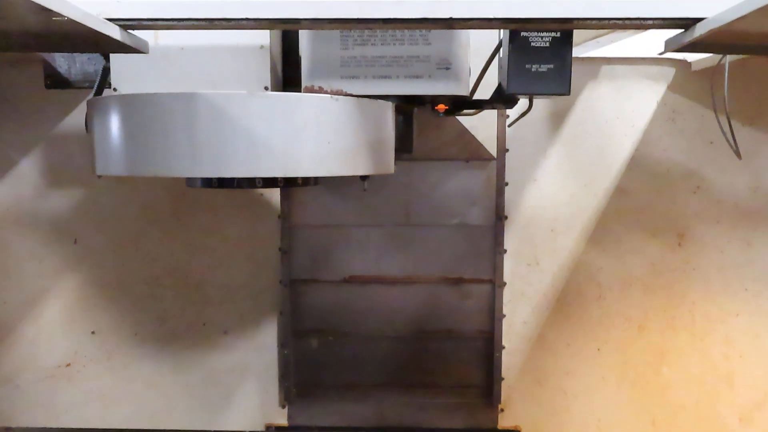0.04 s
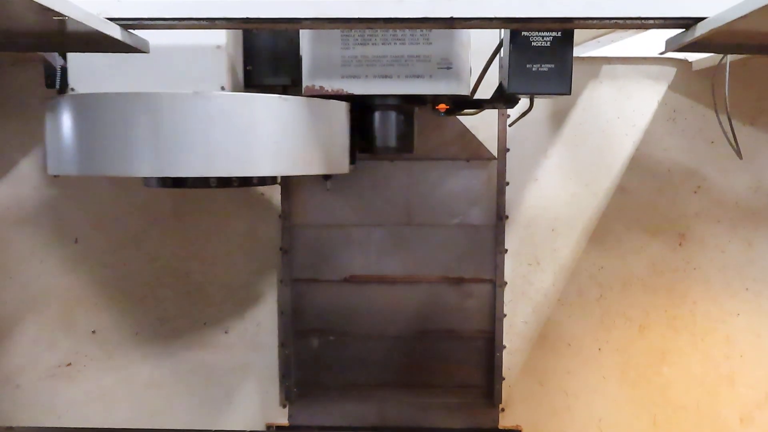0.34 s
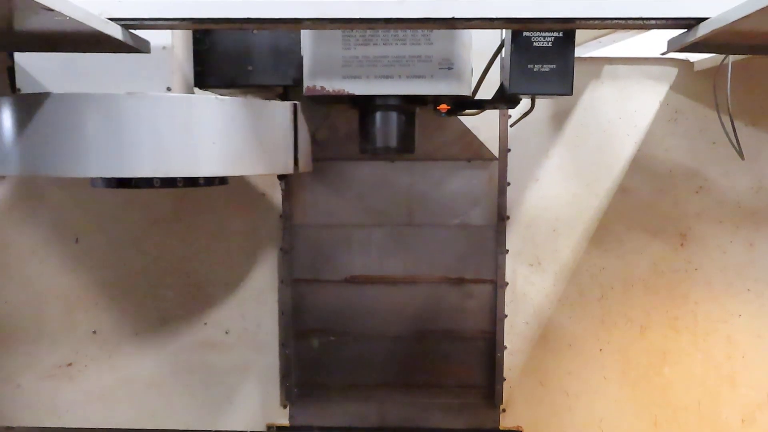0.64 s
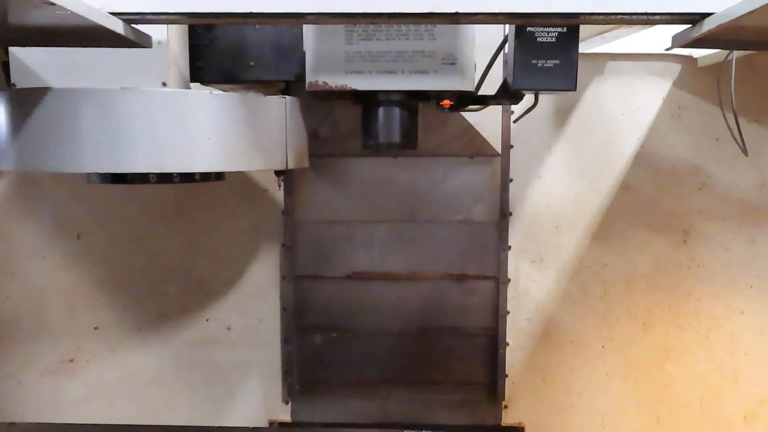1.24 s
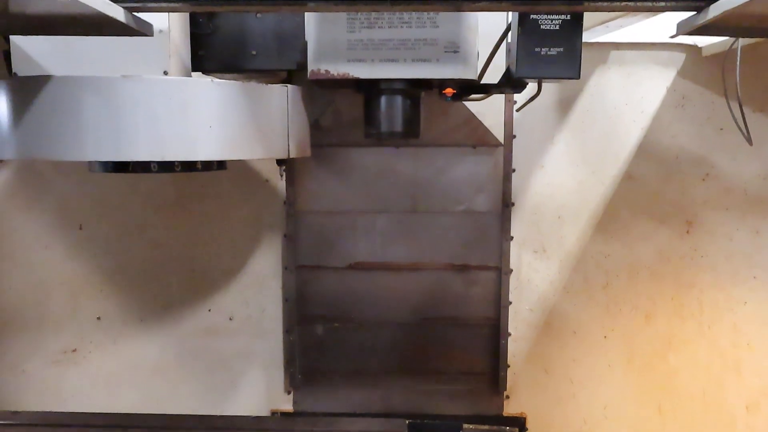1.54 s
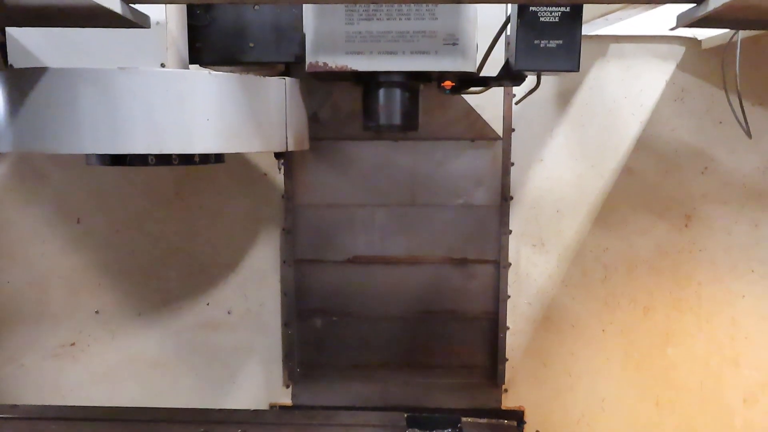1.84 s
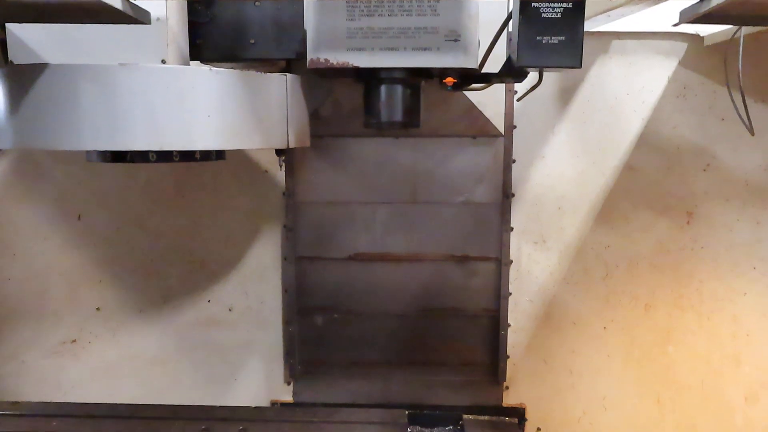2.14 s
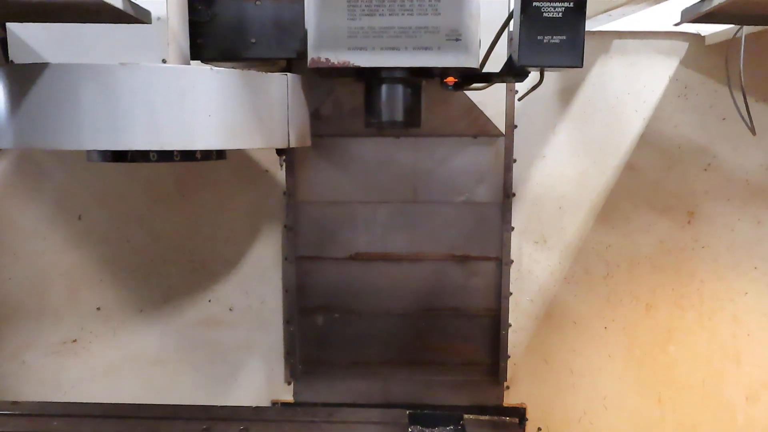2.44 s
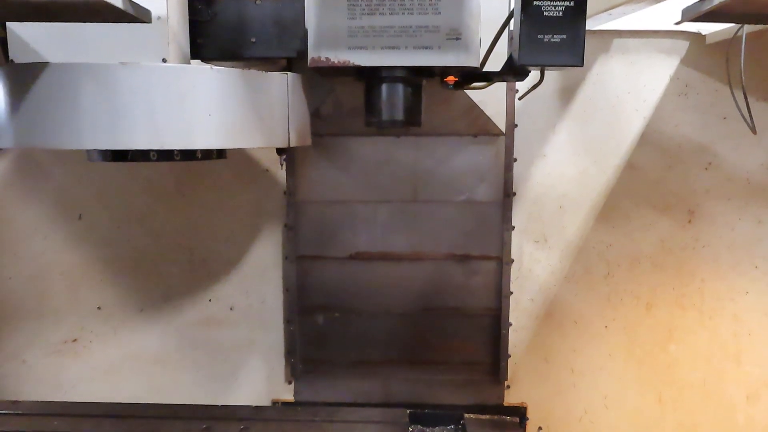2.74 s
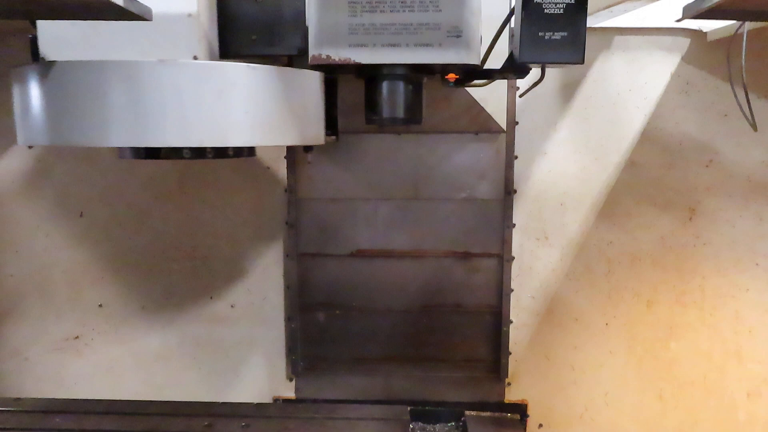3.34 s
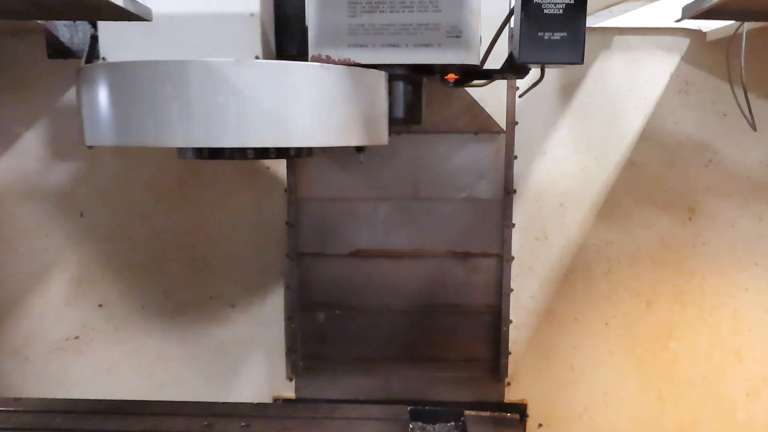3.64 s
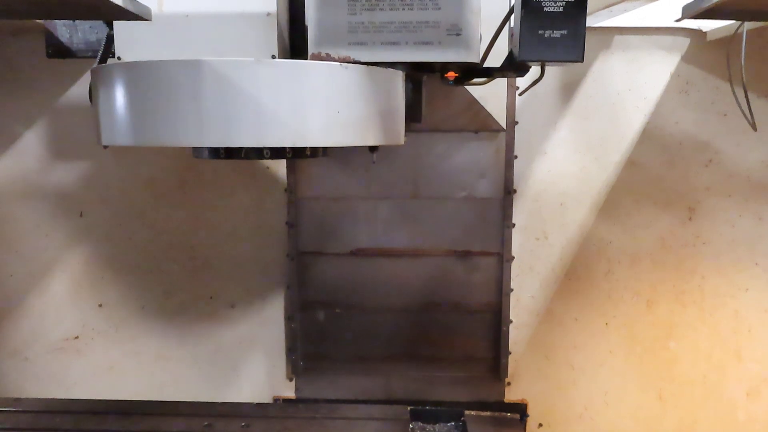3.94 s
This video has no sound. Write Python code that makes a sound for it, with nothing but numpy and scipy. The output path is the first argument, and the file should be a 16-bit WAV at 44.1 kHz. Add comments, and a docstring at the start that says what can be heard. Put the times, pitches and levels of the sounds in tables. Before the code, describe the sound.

An idling machining centre drones and clatters steadily over rushing fans and coolant, heard close at its open enclosure. The tool carousel rumbles in, scrapes briefly, then slides back out, ending with a rattle and a soft bump.

```python
"""The pump of an idling machining centre, heard from a close stereo pair at the open enclosure.
It knocks several times in every turn of its shaft and makes the sheet metal drone. The tool carousel
slides in and later back out, rumbling on its rails, and ends its travel with a rattle and a soft bump.
Behind them are the rush of fans and coolant, whirring drives, thin bearing whistles and mains hum."""
import sys
import numpy as np
from scipy import signal
from scipy.fft import rfft, irfft
from scipy.io import wavfile
from scipy.ndimage import uniform_filter1d, map_coordinates

SR = 44100
rng = np.random.default_rng(int(sys.argv[2]) if len(sys.argv) > 2 else 0)


def wav_out(sig):
    """Save sig, one row per channel (or a flat mono array), as 16-bit PCM at SR to the path in sys.argv[1]."""
    wavfile.write(sys.argv[1], SR, np.round(np.clip(np.atleast_2d(sig).T, -1, 1) * 32767).astype(np.int16))


N = 176400


def pump(t, size=4096):
    """The same knocks ring housing and panels in every turn, droning at multiples of the shaft rate."""
    # The knocks of one turn. Each row: delay in ms, strength in dB.
    knocks = [(.32, -2.1), (16.42, -11.1), (17.21, -11), (22.88, -10.7), (33.36, -7.2), (38.01, -7.6),
              (39.5, -13.6), (45.05, -6.5)]
    # Modes of the pump housing. Each row: frequency in Hz, width in Hz.
    housing = [(108, 13), (216, 56), (487.5, 12), (526.4, 12), (643, 26.5), (921, 31)]
    # Drone of pump and housing. Each row: multiple of the shaft rate, level in dB.
    drone = [(2, -56), (3, -71), (4, -44), (5, -42), (6, -41), (7, -50), (8, -37), (9, -47), (10, -36),
             (11, -31.5), (12, -33), (13, -36), (14, -42), (15, -45), (16, -37), (17, -49), (18, -38),
             (19, -46), (20, -39), (21, -46), (22, -44), (23, -40), (24, -52), (25, -43), (26, -38),
             (27, -41), (28, -43), (29, -29.8), (30, -33), (31, -37), (32, -42), (33, -32), (34, -27),
             (35, -30), (36, -37), (37, -42), (38, -47), (39, -42), (40, -42), (41, -50), (42, -35),
             (43, -38), (44, -41), (45, -45), (46, -33), (47, -35), (48, -41), (49, -31.5), (50, -50),
             (51, -45), (52, -44), (53, -41), (54, -37), (55, -41), (56, -43), (57, -37), (58, -45),
             (59, -43), (60, -42)]
    # Higher multiples that the panels pick out. Each row: frequency in Hz, level in dB.
    whine = [(1136, -45), (1155, -46), (1228, -46), (1320, -41), (1393, -42), (1613, -45), (1631, -38),
             (1650, -43), (1760, -39), (1796, -46), (1833, -46.5), (1869, -44.5), (1906, -41),
             (2034, -43.5), (2236, -47), (2511, -48), (2584, -46), (3171, -50), (3391, -51), (3601, -51),
             (4043, -53), (4156, -54)]
    # The rest of the clatter. Each row: frequency in Hz, level per multiple in dB.
    clatter = [(1100, -51), (1300, -58), (1550, -51), (1850, -47), (2300, -51), (2850, -61.5), (3400, -55),
               (5000, -67), (7000, -74.5), (14000, -83)]
    # The pump grows a little louder. Each row: time in seconds, gain in dB.
    level = [(0, -2.5), (1, -0.47), (2, 0.25), (3, 0.56), (4, 0.5)]
    shaft_hz, first_knock_s, speed_wander = 18.328, .0441, .0003
    ring_s, ring_db, ring_hz = .013, 8, 1510  # sheet metal rings in the treble after each knock
    throb_db, throb_s = .9, .005  # the pump labours once a turn, just after the first knock
    drift_s = speed_wander * np.cumsum(walk(count=8, size=N)) / SR
    turns = shaft_hz * (t - first_knock_s + drift_s)
    age = np.arange(size) / size / shaft_hz
    hz = np.arange(size // 2 + 1) * shaft_hz + 1e-9
    treble = undb(ring_db) / (1 + (ring_hz / hz) ** 2) ** 2
    lines = 0
    for ms, db in knocks:
        ring = rng.standard_normal(size) * np.exp(-age / ring_s)
        knock = undb(db) + treble * rfft(ring / np.linalg.norm(ring))
        lines = lines + knock * np.exp(-2j * np.pi * hz * ms / 1000)
    lines = lines * sum(1 / (1 + 1j * (hz * hz - f * f) / (hz * width)) for f, width in housing)
    # Knocks and housing give the phases and the clatter's ripple; the tables give the levels.
    ripple = abs(lines) / np.sqrt(uniform_filter1d(abs(lines) ** 2, size=12))
    gain = ripple * colour(clatter, hz)
    gain[:2] = 0
    gain[2:2 + len(drone)] = undb([db for _, db in drone])
    for f, db in whine:
        gain[int(round(f / shaft_hz))] = undb(db)
    one_turn = irfft(gain * lines / abs(lines)) * size / np.sqrt(2)
    throb = undb(throb_db * np.cos(2 * np.pi * (turns - throb_s * shaft_hz)))
    return map_coordinates(one_turn, [turns % 1 * size], mode="grid-wrap") * fader(level) * throb


def carousel():
    """The tool carousel runs along its rails, brakes and meets its stop."""
    # Its travel rings the enclosure.
    # Each row: start and length in seconds, frequency and width in Hz, level in dB.
    rumbles = [(.43, 0.23, 219, 12, -31.5), (2.685, 0.13, 200, 200, -34), (3.056, 0.35, 327, 96, -34),
               (3.17, 0.13, 464, 41, -29), (3.42, 0.13, 229, 12, -27), (3.497, 0.055, 860, 70, -29),
               (3.564, 0.26, 212, 46, -35), (3.3, .6, 100, 54, -37.5)]
    # In the same columns:
    scrapes = [(1.03, 0.063, 2120, 160, -36), (1.17, 0.14, 2280, 90, -34.5), (1.68, 0.089, 2050, 160, -34),
               (2.36, 0.051, 2210, 90, -31.5), (2.62, .2, 1990, 200, -35)]  # brief metallic scrapes
    slide = (3.28, 1, 6500, 3500, -46)  # the rails hiss as it slides back
    rattle = (3.885, .11, 2300, 516, -28.5)  # it rattles as it brakes
    return sum(swell(*row) for row in rumbles + scrapes + [slide, rattle]) + bump(start_s=3.937)


def bump(start_s, rise_s=.01, decay_s=.018):
    """A cushioned knock: the low modes of the enclosure build up and die away."""
    # Each row: mode frequency in Hz, peak level in dB.
    modes = [(89, -28), (149, -21), (262, -15.5)]
    age = np.maximum(np.arange(N) / SR - start_s, 0)
    envelope = np.minimum(age / rise_s, 1) * np.exp(-np.maximum(age - rise_s, 0) / decay_s)
    return envelope * sum(undb(db) * np.sin(2 * np.pi * hz * age) for hz, db in modes)


def rush(flicker_db=.41, panel_ripple_db=1.68):
    """Fan and coolant noise coloured by the panels, with drives and bearings; returns mid and side."""
    # The rush inside the enclosure. Each row: frequency in Hz, noise density in dB.
    spectrum = [(20, -84), (45, -71), (70, -73), (110, -59.5), (170, -58.5), (220, -55), (270, -59),
                (400, -61), (480, -56), (560, -58.5), (640, -57), (780, -61), (1000, -60.5), (1300, -60),
                (1650, -61.5), (2150, -62), (2550, -63.5), (2850, -67.5), (3300, -67), (4200, -69),
                (4750, -74.5), (5050, -73), (5600, -78.5), (6300, -73), (6900, -77.5), (8500, -79),
                (10500, -82), (13800, -79.5), (15200, -93)]
    # It slowly grows. Each row: time in seconds, gain in dB.
    level = [(0, -1.5), (.8, -0.6), (1.4, 0), (2.2, 0.8), (3.2, 0.84), (4, 2)]
    # Its diffuse part. Each row: frequency in Hz, side relative to mid in dB.
    diffuse = [(60, -51), (200, -18), (700, -22), (1400, -19.5), (2300, -12.5), (4000, -10.5), (7000, -12),
               (14000, -8)]
    # Panels ringing in the rush. Each row: frequency and width in Hz, level in dB.
    panels = [(218.6, 16, -42.5), (483, 7.3, -43.5), (626.6, 14.3, -36), (811, 5, -49), (869, 11, -42)]
    whistles = [(5050, 62, -51), (5170, 18, -53.5), (6360, 36, -54), (7310, 120, -58), (9100, 100, -64),
                (12030, 100, -57.5)]  # thin bearing whistles, same columns
    f = np.fft.rfftfreq(N, 1 / SR)
    ripple = undb(panel_ripple_db * walk(count=500, size=len(f)) * np.minimum(f / 2500, 1))
    shape = colour(spectrum, f) * np.sqrt(SR / 2) * ripple
    gain = fader(level) * undb(flicker_db * walk(count=90, size=N))
    mid = irfft(noise() * shape, N) + whirr()
    mid += sum(undb(db) * resonance(hz, width) for hz, width, db in panels + whistles)
    side = irfft(noise() * shape * colour(diffuse, f), N)
    return gain * mid, gain * side


def whirr(swell_db=2.2, flare_db=3):
    """Metallic resonances of the drives swell together and flare up briefly one by one."""
    # Each row: frequency and width in Hz, level in dB.
    bands = [(2018, 65, -42), (2165, 90, -42), (2293, 80, -46), (2460, 110, -47.5), (3526, 260, -46)]
    together = swell_db * walk(count=56, size=N)
    out = 0
    for hz, width, db in bands:
        band = resonance(hz, width) * undb(together + flare_db * walk(count=100, size=N))
        out = out + undb(db) * band / band.std()
    return out


def hum(t, waver_db=2.5, drift_rad=.22):
    """Steady tones of transformer and fans that waver slightly."""
    # Each row: frequency in Hz, level in dB.
    tones = [(59, -53), (120, -39.5), (630, -45)]
    out = 0
    for hz, db in tones:
        amplitude = np.sqrt(2) * undb(db + waver_db * walk(count=20, size=N))
        out = out + amplitude * np.sin(2 * np.pi * hz * t + drift_rad * walk(count=16, size=N))
    return out


def swell(start, length, hz, width, db, fade_s=.03):
    """A resonance that is shaken for a while."""
    t = np.arange(N) / SR
    gate = np.clip(np.minimum(t - start, start + length - t) / fade_s + .5, 0, 1)
    y = gate * resonance(hz, width)
    return undb(db) * y * np.sqrt(np.sum(gate ** 2) / np.sum(y ** 2))


def resonance(hz, width):
    """Noise in one steep resonance, rms 1."""
    f = np.fft.rfftfreq(N, 1 / SR) + 1e-9
    y = irfft(noise() / (1 + 1j * (f * f - hz * hz) / (f * width * np.sqrt(2))) ** 2, N)
    return y / y.std()


def noise():
    """Spectrum of white noise."""
    return rfft(rng.standard_normal(N))


def walk(count, size):
    """A smooth curve of spread 1 through count random values."""
    y = signal.resample(rng.standard_normal(count), size)
    return y / y.std()


def colour(points, hz):
    """Gain through (Hz, dB) points on a log-frequency axis."""
    f, db = np.array(points, float).T
    return undb(np.interp(np.log(hz + 1e-9), np.log(f), db))


def fader(points):
    """Gain through (seconds, dB) points."""
    return undb(np.interp(np.arange(N) / SR, *np.array(points, float).T))


def undb(db):
    """Decibels to amplitude."""
    return 10 ** (np.asarray(db) / 20)


def scene():
    """The machine reaches two close microphones, the left one slightly earlier and louder."""
    # Balance of the pair. Each row: frequency in Hz, left minus right in dB.
    balance = [(150, 0), (700, 1), (1500, 1.7), (4400, 1.3), (15000, 0)]
    lag_s = 28.2e-6
    t, f = np.arange(N) / SR, np.fft.rfftfreq(N, 1 / SR)
    air, side = rush()
    edge_fade = signal.windows.tukey(N, .001)
    mid = rfft((pump(t) + carousel() + air + hum(t)) * edge_fade)
    left_right = np.array([[1], [-1]])
    mics = colour(balance, f) ** (left_right / 2) * np.exp(1j * np.pi * f * left_right * lag_s)
    return irfft((mid + left_right * rfft(side)) * mics, N)


def record(dry):
    """The recorder cuts the top octave off steeply above top_hz."""
    top_hz = 15300
    return signal.sosfilt(signal.ellip(8, .2, 70, top_hz, fs=SR, output="sos"), dry)


dry = scene()
out = record(dry)
wav_out(out)
```